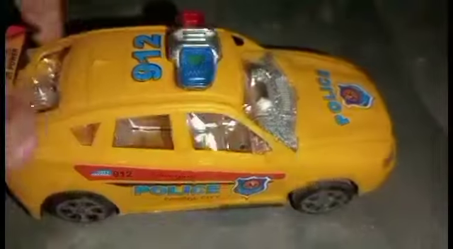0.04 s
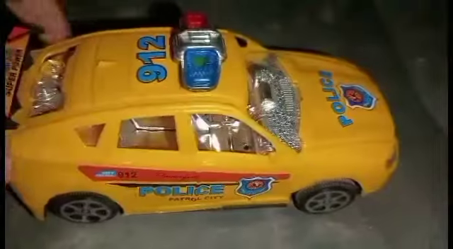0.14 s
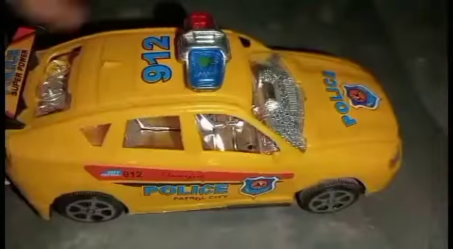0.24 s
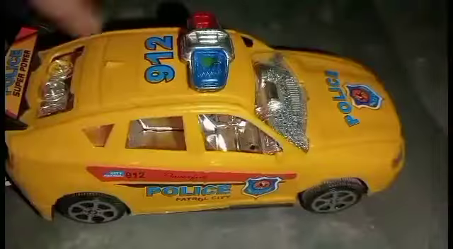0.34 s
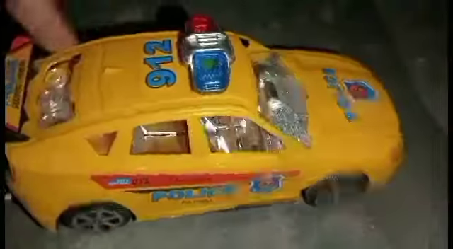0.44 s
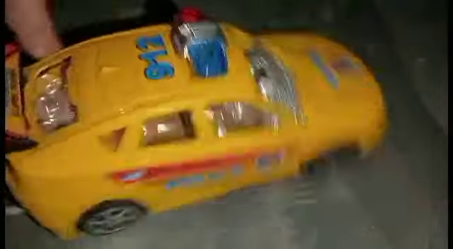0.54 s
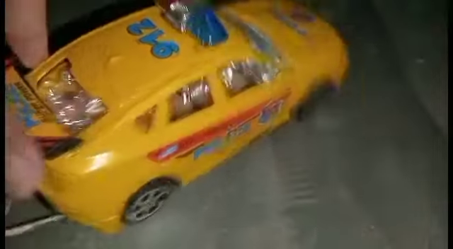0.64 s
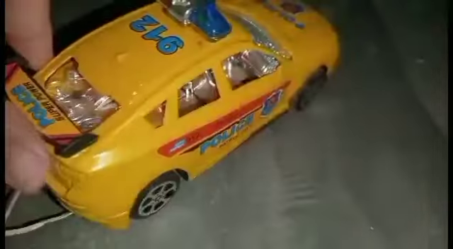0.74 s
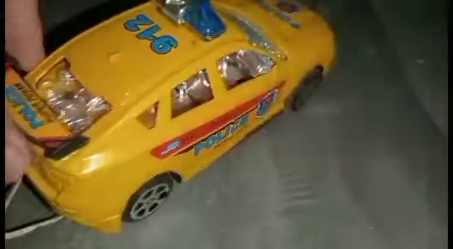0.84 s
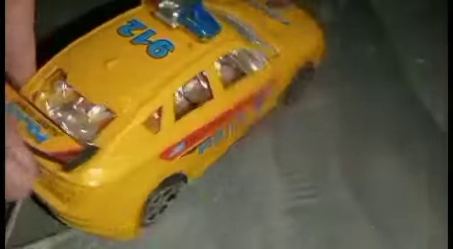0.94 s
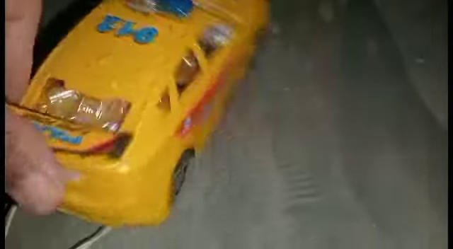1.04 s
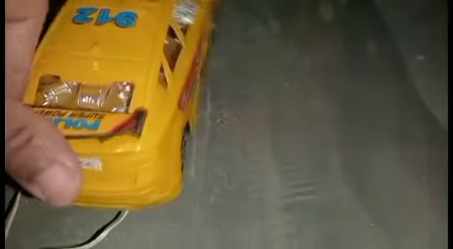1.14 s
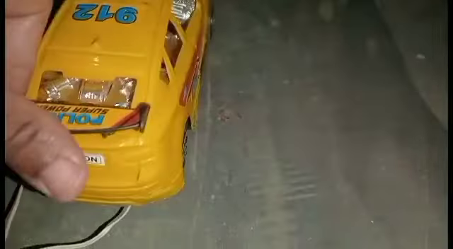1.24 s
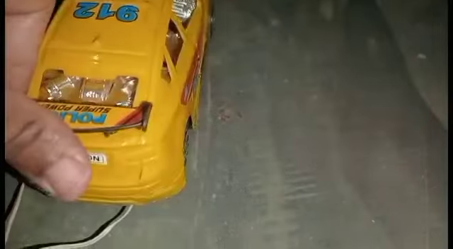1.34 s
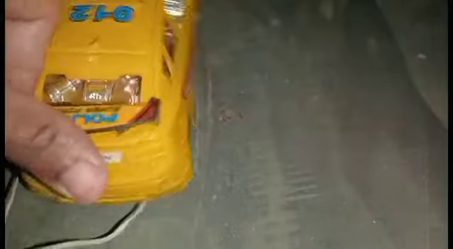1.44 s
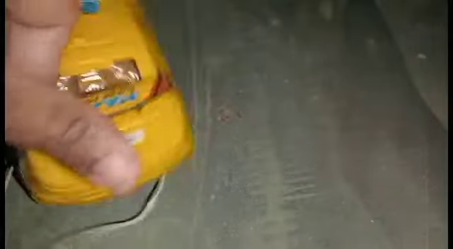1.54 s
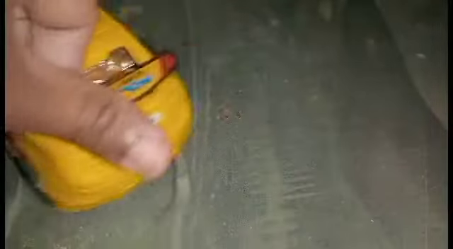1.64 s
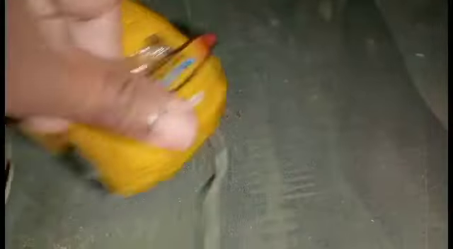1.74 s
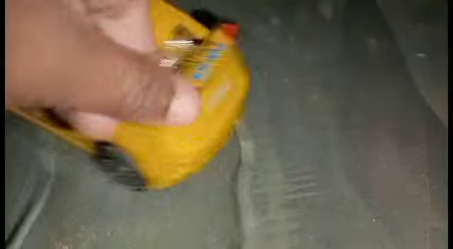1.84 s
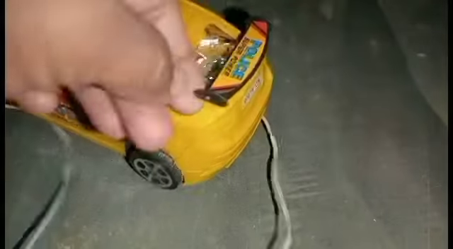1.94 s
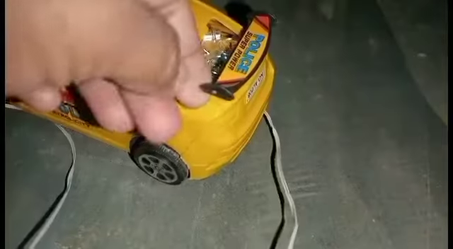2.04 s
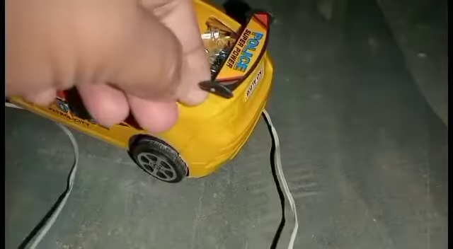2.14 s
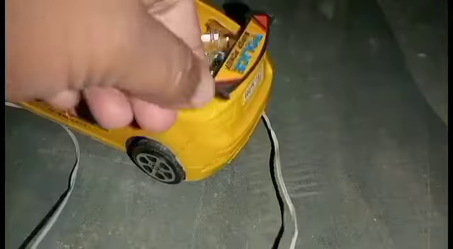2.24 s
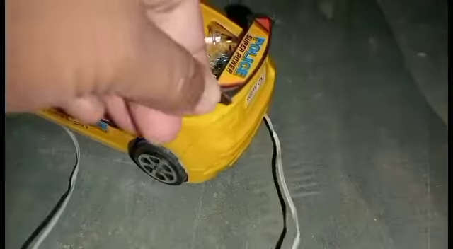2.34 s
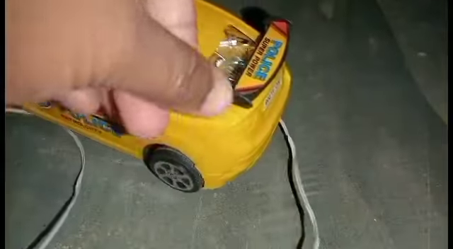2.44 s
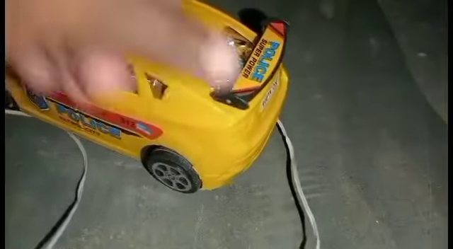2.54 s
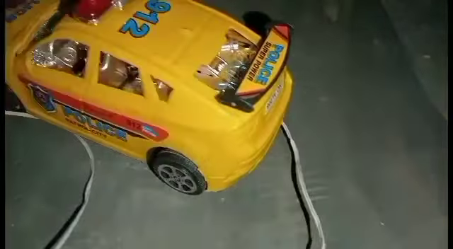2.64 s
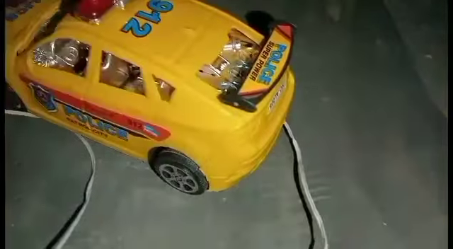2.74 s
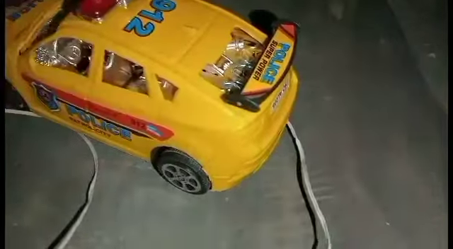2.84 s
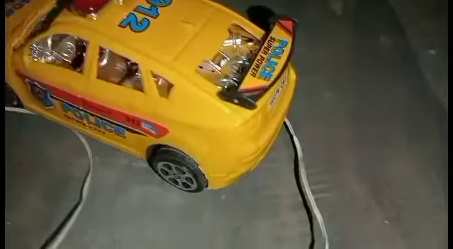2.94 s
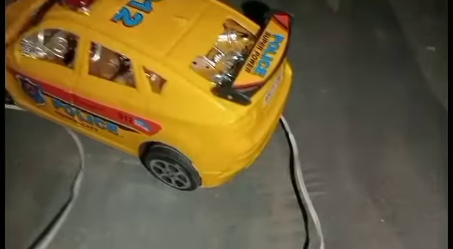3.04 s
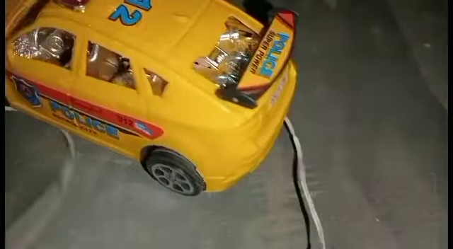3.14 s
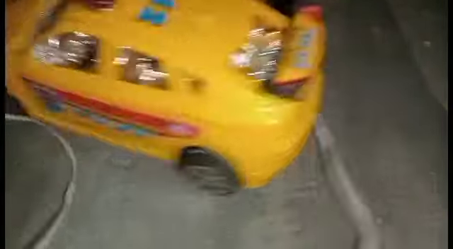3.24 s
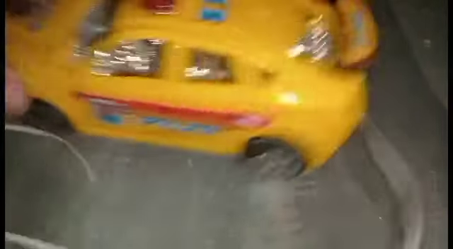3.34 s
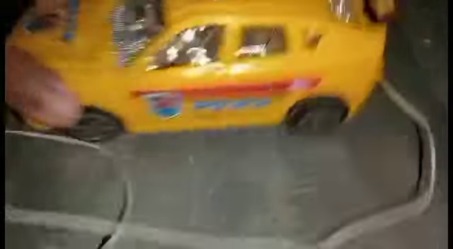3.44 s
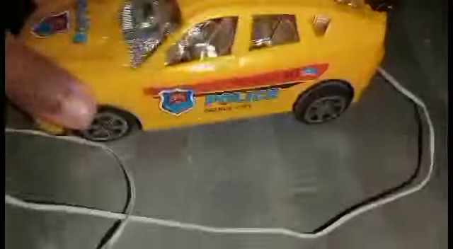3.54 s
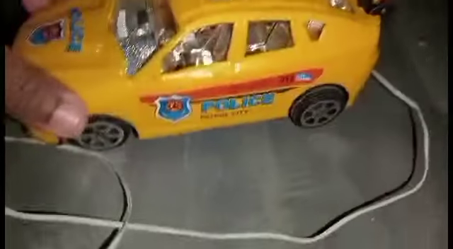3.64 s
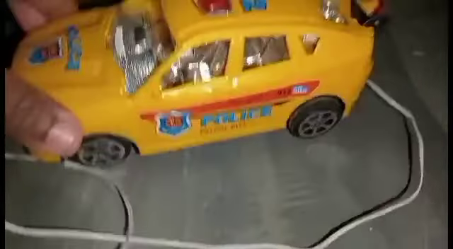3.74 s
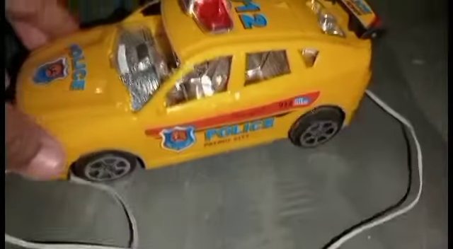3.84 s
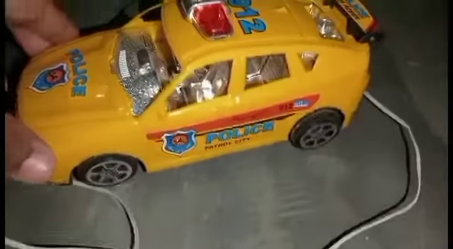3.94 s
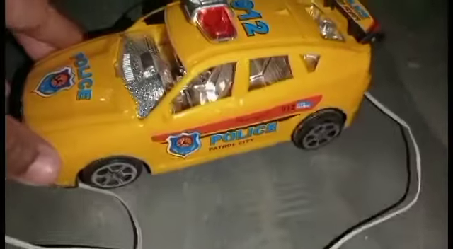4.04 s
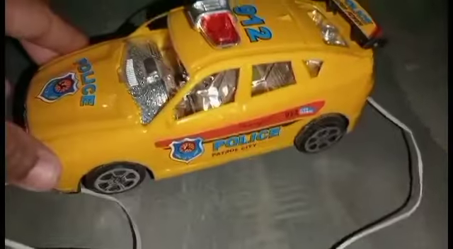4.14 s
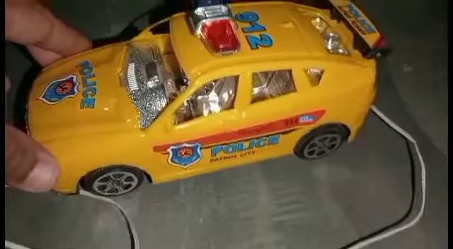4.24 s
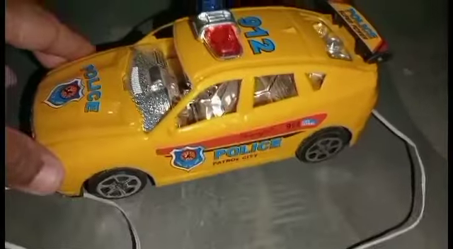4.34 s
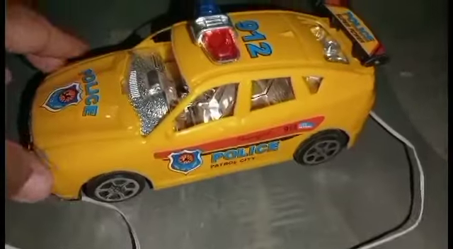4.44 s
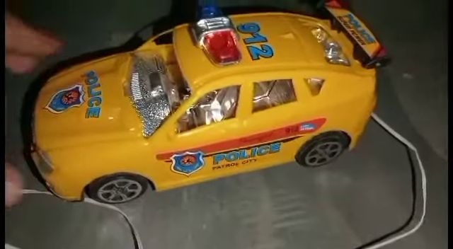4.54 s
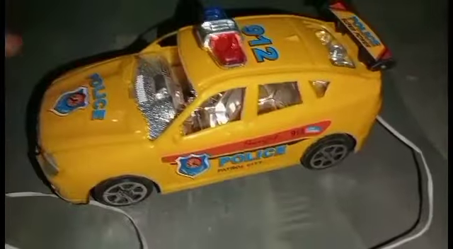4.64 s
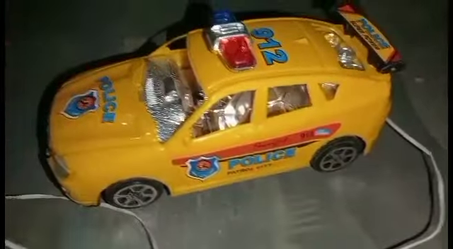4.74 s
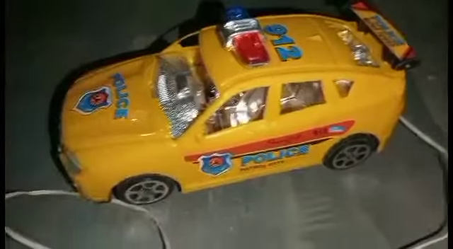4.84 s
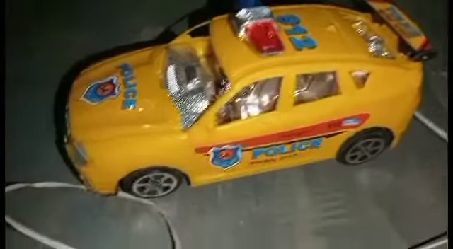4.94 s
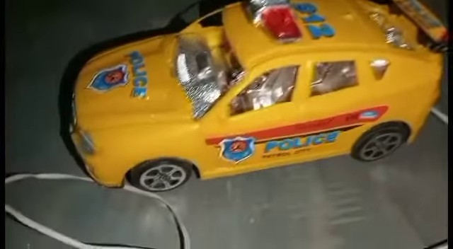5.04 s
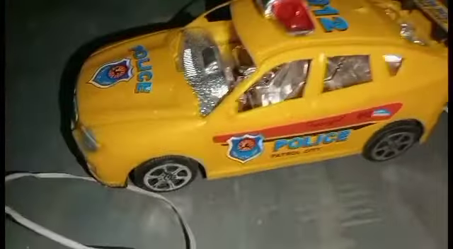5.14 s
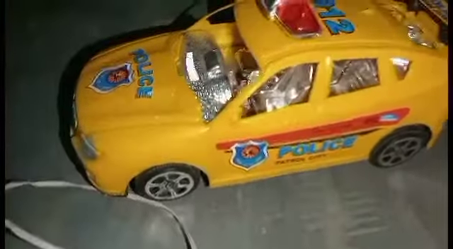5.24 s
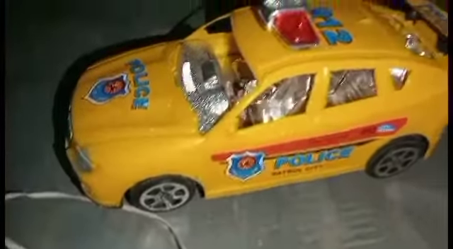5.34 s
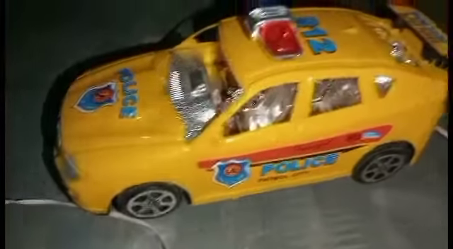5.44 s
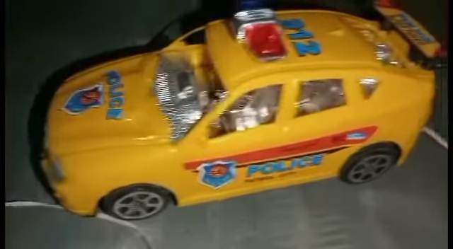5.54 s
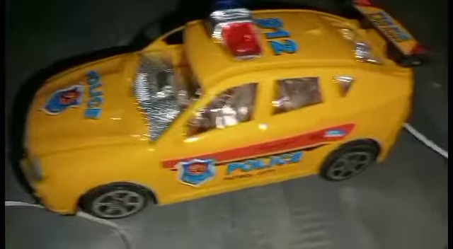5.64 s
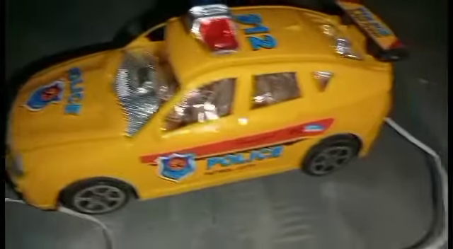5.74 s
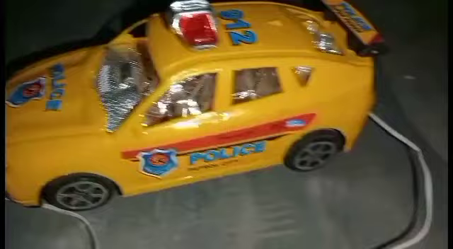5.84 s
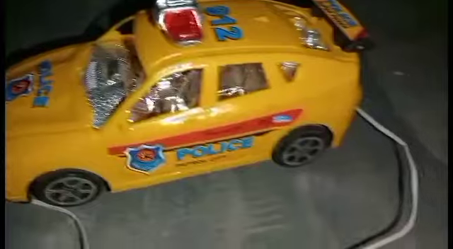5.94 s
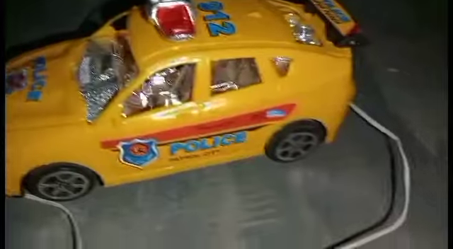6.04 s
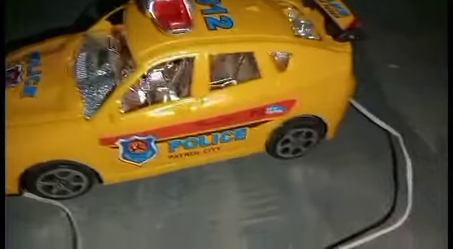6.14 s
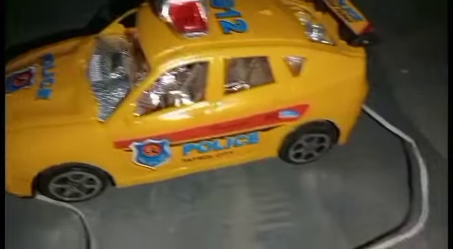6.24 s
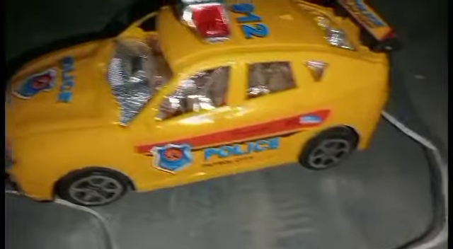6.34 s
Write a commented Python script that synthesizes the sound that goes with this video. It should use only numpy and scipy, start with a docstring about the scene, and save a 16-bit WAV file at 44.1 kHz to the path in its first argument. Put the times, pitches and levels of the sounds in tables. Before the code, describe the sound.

Close to the microphone in a small room, a hollow plastic toy car is pushed by hand over a hard, gritty floor. Short crunchy rasps with sharp plastic clacks come first, then a tight cluster of scrapes with a rough squawk around two seconds. Small ticks follow, then one strong swelling rasp after a pause, a few faint scuffs, and finally only faint hum and hiss.

```python
"""A hollow plastic toy car, pushed to and fro by hand on a hard, dusty floor, close to the microphone.
Four wheels crunch over grit and chatter on loose axles: random clicks excite the ringing shell.
Loose parts knock as short shell rings when the car is turned or stopped; one turn squawks by stick and slip.
Hands add a dull rumble and soft bumps. A small room answers with a noise tail over faint hum and hiss."""
import sys
import numpy as np
from scipy import signal
from scipy.fft import rfft, irfft, next_fast_len
from scipy.io import wavfile
from scipy.ndimage import uniform_filter1d, map_coordinates

SR = 44100
rng = np.random.default_rng(int(sys.argv[2]) if len(sys.argv) > 2 else 0)


def store_wav(level_fs):
    """Save 16-bit WAV to argv[1]."""
    pcm = np.round(np.clip(np.atleast_2d(level_fs), -1, 1) * 32767)
    wavfile.write(sys.argv[1], SR, pcm.T.astype(np.int16))


N = 282415
T = np.arange(N) / SR

# Strokes of the hand: start t/s, fastest t/s, stop t/s, top level/dB of the shell rasp, swell from the start/dB,
# run-out/(dB/s), floor rumble relative level/dB, grit hiss relative level/dB, treble boost/dB,
# shell ring under this grip f/Hz, its width f/Hz, its boost/dB
STROKES = [(0, 0.164, .27, -28, 10.5, 480, -17, -0.5, 2.5, 1690, 280, 6.5),
           (0.448, 0.449, 0.52, -66, 6.5, 320, -2.5, 3.5, 0, 1600, 300, 0.5),
           (0.672, .825, 0.93, -32, 11.5, 452, -13, -5, 15, 1760, 85, 10),
           (1.141, 1.32, 1.402, -29.5, 10.5, 750, -14, -2.5, 1.5, 1500, 229.8, 1.5),
           (1.637, 1.695, 1.718, -30, 11, 420, -16.5, -5, -2, 1379, 400, 7),
           (1.723, 1.799, 1.915, -31.5, 3.5, 418, -23.5, -.5, -5, 1600, 400, 2),
           (1.953, 2, 2.075, -34, 5, 420, -21.5, -4.5, -2.5, 1960, 401, 2.5),
           (2.091, 2.15, 2.194, -34.5, 3.5, 422, -16.5, -4.5, -4, 1600, 400, 0),
           (2.197, 2.222, 2.314, -43.5, 14.5, 520, -14.5, -2, -7, 1740, 400, 1),
           (2.395, 2.42, 2.46, -63.5, 9, 417, -18, -4, 12, 1910, 260, 7),
           (2.496, 2.514, 2.55, -45, 8, 750, -15, -10.5, 5, 1730, 260, 1),
           (2.62, 2.624, 2.737, -46, 12.5, 549, -15.5, -8, 9, 1700, 261, 7),
           (3.314, 3.32, 3.44, -58, 3.5, 420, -11.5, -1.5, 1.5, 1500, 300, 1),
           (3.434, 3.664, 3.752, -26, 14.5, 950, -14.5, -5.5, 1.5, 1530, 401.4, 4),
           (3.812, 3.88, 3.89, -42.5, 2.5, 326, -14.5, -7, 6, 1580, 120, 2.5),
           (3.958, 4.124, 4.137, -41, 3, 900, -16, -11, 8, 1520, 130, 10.5),
           (4.201, 4.183, 4.24, -41, 3.5, 850, -14.5, -8.5, -2, 1475, 110, 15),
           (4.325, 4.385, 4.502, -45, 6, 1000, -10, -5, 7, 1670, 100, 7)]
# Wheels, axles and shell knocking: t/s, peak level/dB, low thud level/dB and bright snap level/dB
# (both in the mix before it is scaled to the peak), main ring f/Hz
KNOCKS = [(0.013, -18.5, -25, -18, 1840), (.124, -16.5, -30, -11, 1700), (0.155, -17.5, -37, -4, 1660),
          (.167, -18, -38, -9, 1630), (0.177, -10.5, -46, -19, 1750), (.686, -21, -34, -15, 1780),
          (0.899, -15, -28, -12, 1784), (1.078, -32.5, -25, -20, 1565), (1.409, -19, -58, -13.5, 1424),
          (1.58, -44, -22, -12, 1370), (1.776, -17, -30, -6, 1830), (1.915, -15.5, -44, -8, 2010),
          (1.921, -15.5, -42, -9.5, 2180), (1.963, -17, -26, -11, 1960), (1.973, -15.5, -35, -19, 1890),
          (1.979, -9.5, -46, -17, 1970), (2.03, -11, -39, -9, 2154), (2.092, -17, -32, -10.5, 1480),
          (2.106, -9.5, -35, -4.5, 1560), (2.122, -18.5, -32, -9, 1730), (2.169, -19, -39, -28, 1580),
          (2.264, -30, -25, 1, 1980), (2.326, -32.5, -15.5, -16, 1740), (2.501, -17.5, -46, -14, 1843),
          (2.511, -31, -34, -30, 1390), (2.532, -35, -31, -11, 1620), (2.581, -47, -26, -10, 1420),
          (2.644, -28.5, -28, -8, 1390), (2.656, -20, -26, -11.5, 1566), (2.667, -27, -15.5, -32, 1420),
          (2.702, -29.5, -26, -36, 1610), (3.297, -29.5, -30, -10.5, 1636), (3.305, -28, -22, -11, 1980),
          (3.32, -29.5, -18, -25, 1440), (3.409, -33.5, -26, -2, 1600), (3.578, -12, -33, -25, 1935),
          (3.597, -14, -41, -18, 1990), (4.033, -32, -35, 4, 1600), (4.204, -29.5, -31, -6, 1380),
          (4.276, -40, -26, -22, 1650), (4.354, -31, -24, -18, 1260), (4.411, -35, -25, 0, 1370),
          (4.442, -25.5, -13.5, -3.5, 1790), (4.664, -53, -18, -8, 1640)]
# Colour of the shell and the floor under it: f/Hz, level/dB
SHELL_COLOUR = [(200, -35.5), (330, -32.5), (490, -17.5), (750, -11.5), (1050, -7), (1660, -1), (2400, -9),
                (3000, -15.5), (3420, -22), (4300, -8), (6100, -8.5), (7800, -20.5), (9600, -18.5),
                (14000, -30)]
# Clearest shell modes: f/Hz, ring time t60/s, level/dB
SHELL_MODES = [(644, 0.1, -17), (940, 0.049, -15.5), (1388, 0.076, -7.5), (1668, 0.065, -6),
               (1854, 0.068, -7), (2170, 0.033, -9), (2436, 0.069, -11.5), (2930, 0.087, -16),
               (4110, .04, -12.5), (4854, 0.036, -3.5), (5130, 0.033, -15), (5894, 0.031, -2)]
# Partials of the judder: multiple of the slip rate, level/dB
SKID_PARTIALS = [(1, -3), (2, -3.5), (3, -19.5), (4, -17.5), (5, -9), (6, -20)]
# Soft bumps of the hand: t/s, level/dB before the soft onset, f/Hz
BUMPS = [(.692, -50.5, 147), (1.065, -41.5, 108), (1.636, -40.5, 86), (1.898, -44, 94), (2.69, -44, 86),
         (2.728, -51, 129), (3.306, -53.5, 120), (5.471, -55, 110), (6.232, -51.5, 121)]
# Colour of the still room: f/Hz, relative level/(dB per Hz)
AIR_COLOUR = [(15, -55), (25, -26), (53, -17), (71, -5), (125, -7.5), (224, -18.5), (301, -12.5),
              (373, -20), (415, -16.5), (621, -22.5), (2630, -26), (7890, -34), (13800, -37), (15000, -33)]

# Strokes: the wheels break loose at the attack rate; around a push they still creep,
# LOOSE_DB below it and fading further at LOOSE_DB_PER_S
ATTACK_DB_PER_S, LOOSE_DB, LOOSE_DB_PER_S = 1100, 14.5, 170
SWELL_CURVE = 1.7  # 1 = swells at a steady dB per s, 2 = rounds off towards the top
BRAKE_SHARE = 0.67  # level lost before the stop, as a share of the swell
HISS_PER_DB, RUMBLE_PER_DB = 0.13, -0.04  # faster rolling is brighter: relative dB per dB of level
LOW_CUT_HZ = 260  # small wheels radiate little bass
HUB_HZ, HUB_WIDTH_HZ, HUB_DB = 5000, 570, 2.5  # ring of the wheel hubs
PANEL_T60_S = .024  # ring time of the panels after a knock
# The turn: a wheel judders sideways, and slips more slowly the harder it is pressed
SKID_START_S, SKID_STOP_S = 1.89, 2.06
SKID_LIGHT_HZ, SKID_PRESSED_HZ = 1112.7, 955
SKID_DB, SKID_JOLT_DB = -35, -6  # level at full pressure; extra squawk relative to the smoothed knocks
HOLD_DB, PUSH_DB = -73, -72  # low rumble of the hands at rest, and amplitude added while they push
AIR_DB = -68.5  # room air, before its wavering
TOP_HZ = 15450  # upper limit of the recorder


def rolling():
    """All four wheels over grit: each stroke is louder and brighter with speed; the grip tunes the shell."""
    wheels = [wheel(grains_per_s=1600, spread_db=3.0, chatter_db=3.0, chatter_rate=240) for _ in range(4)]
    total_load = np.sqrt(sum(load ** 2 for load, _ in wheels))
    crunch = sum(load * grit for load, grit in wheels) / total_load
    crunch = shifting(crunch, swing_db=3.5, rate=24, relative_width=0.086)
    crunch = crunch + (undb(HUB_DB) - 1) * resonate(crunch, HUB_HZ, HUB_WIDTH_HZ)
    crunch = signal.sosfilt(signal.butter(2, LOW_CUT_HZ, "high", fs=SR, output="sos"), crunch)
    treble = band(crunch, 9500, 21000, order=1)
    out = np.zeros(N)
    for (start, fastest, stop, db, swell_db, release, rumble_db, hiss_db, treble_db,
         ring_hz, width_hz, ring_db) in STROKES:
        moving = (T > start - .2) & (T < stop + .2)  # with the creep before and after
        drive_db = effort(T[moving], start, fastest, stop, swell_db, release)
        grit = crunch[moving]
        grip_ring = (undb(ring_db) - 1) * resonate(grit, ring_hz, width_hz)
        held = grit + grip_ring + (undb(treble_db) - 1) * treble[moving]
        rumble, rasp, hiss = registers(held)
        rumble = rumble * undb(rumble_db + RUMBLE_PER_DB * drive_db)
        hiss = hiss * undb(hiss_db + HISS_PER_DB * drive_db)
        out[moving] += undb(db + drive_db) * (rumble + rasp + hiss)
    return out


def effort(t, start, fastest, stop, swell_db, release_db_per_s):
    """Stroke level re its top, in dB: the car creeps, breaks loose, speeds up, slows and runs out."""
    speeding = np.clip((fastest - t) / max(fastest - start, 1e-3), 0, 1)
    slowing = np.clip((t - fastest) / max(stop - fastest, 1e-3), 0, 1)
    before, after = np.maximum(start - t, 0), np.maximum(t - stop, 0)
    steep_db = ATTACK_DB_PER_S * before + release_db_per_s * after
    creep_db = LOOSE_DB + LOOSE_DB_PER_S * (before + after)
    edge_db = np.minimum(steep_db, creep_db)
    return -swell_db * (speeding ** SWELL_CURVE + BRAKE_SHARE * slowing ** 2) - edge_db


def wheel(grains_per_s, spread_db, chatter_db, chatter_rate):
    """Grit under one wheel: mostly small clicks, a few bigger, bunched as the wheel hops on its axle."""
    hit = rng.random(N) < grains_per_s / SR
    size = undb(spread_db * np.minimum(rng.exponential(size=N), 3)) * rng.choice([-1, 1], N)
    grit = hit * size * undb(chatter_db * walk(chatter_rate))
    rung = signal.fftconvolve(grit, shell(ring_s=0.026, tick_db=-1.0, modes_db=-6))[:N]
    load = undb(3.59 * walk(14))  # the weight shifts from wheel to wheel, and with it the colour
    return load, unit(flex(rung, share=.014, rate=16))


def shell(ring_s, tick_db, modes_db):
    """Response to one contact: a tick, a dense cluster of panel rings, and the modes as struck at that spot."""
    t = np.arange(5000) / SR
    panels = rng.standard_normal(len(t)) * fade(t, ring_s)
    panels /= np.linalg.norm(panels)
    panels[0] += undb(tick_db)
    spot = rng.standard_normal((len(SHELL_MODES), 2))
    modes = np.zeros(len(t))
    for (hz, t60, db), (side, reach) in zip(SHELL_MODES, spot):
        strength = np.sign(side) * undb(db + 0.5 * reach)
        modes += strength * fade(t, t60) * np.sin(2 * np.pi * hz * t)
    return unit(colour(panels, SHELL_COLOUR)) + undb(modes_db) * unit(modes)


def flex(x, share, rate):
    """The shell gives under the hand, so its rings wander a little in pitch."""
    return map_coordinates(x, [np.cumsum(1 + share * walk(rate))], order=3, mode="mirror")


def shifting(x, swing_db, rate, relative_width):
    """As the points of contact move, each shell mode swells and fades on its own."""
    before = uniform_filter1d(x ** 2, size=1024)
    for hz, _, _ in SHELL_MODES:
        x = x + (undb(swing_db * walk(rate)) - 1) * resonate(x, hz, relative_width * hz)
    return x * np.sqrt(before / uniform_filter1d(x ** 2, size=1024))  # keep the short-term energy


def registers(x):
    """Split smoothly into floor rumble, shell rasp and grit hiss, each at rms 1."""
    size = next_fast_len(len(x) + 1024, real=True)
    spectrum, hz = rfft(x, size), np.arange(size // 2 + 1) * SR / size
    low = 1 / (1 + (hz / 850) ** 10)
    high = 1 - 1 / (1 + (hz / 3400) ** 10)
    return [unit(irfft(spectrum * share, size)[:len(x)]) for share in (low, 1 - low - high, high)]


def knocks(body_db, ring_db, ring_t60_s, contact_s):
    """Loose parts hit their stops: the shell responds, and each spot favours one panel ring."""
    out = np.zeros(N + SR)
    for s, db, thud_db, snap_db, ring_hz in KNOCKS:
        thud, body, snap = registers(shell(PANEL_T60_S, tick_db=-9.0, modes_db=-7.5))
        t = np.arange(len(body)) / SR
        ring = unit(np.sin(2 * np.pi * ring_hz * t) * fade(t, ring_t60_s))
        knock = undb(body_db) * body + undb(ring_db) * ring
        knock += undb(thud_db) * thud + undb(snap_db) * snap
        knock *= 1 - np.exp(-t / contact_s)  # the contact softens the onset
        start = int(s * SR)
        out[start:start + len(knock)] += undb(db) * knock / np.abs(knock).max()
    return out[:N]


def skid(jolts, jitter, flutter_db, scatter_db):
    """Stick and slip of a dragged wheel: a rough squawk that sinks under pressure and flares at each jolt."""
    through = np.clip((T - SKID_START_S) / (SKID_STOP_S - SKID_START_S), 0, 1)
    pressure = np.maximum(np.sin(np.pi * through), 0)
    hz = SKID_LIGHT_HZ + (SKID_PRESSED_HZ - SKID_LIGHT_HZ) * pressure
    phase = 2 * np.pi * np.cumsum(hz * (1 + jitter * walk(500))) / SR
    squawk = np.zeros(N)
    for multiple, partial_db in SKID_PARTIALS:
        squawk += undb(partial_db + scatter_db * walk(160)) * np.sin(round(multiple) * phase)
    force = undb(SKID_DB) + undb(SKID_JOLT_DB) * uniform_filter1d(np.abs(jolts), size=500)
    return unit(squawk * undb(flutter_db * walk(180))) * force * np.sqrt(pressure)


def handling(bump_t60_s, waver_db):
    """Dull rumble from the hands, stronger while they push, and soft bumps as decaying low sines."""
    pushing = np.max([(T > start) & (T < stop) for start, _, stop, *_ in STROKES], axis=0)
    pushing = uniform_filter1d(pushing.astype(float), size=4096)
    rumble = unit(band(rng.standard_normal(N), 45, 170, order=3))
    out = rumble * (undb(HOLD_DB) + undb(PUSH_DB) * pushing) * undb(waver_db * walk(10))
    for s, db, hz in BUMPS:
        t = np.maximum(T - s, 0)
        soft_onset = 1 - fade(t, 0.067)
        out += undb(db) * np.sin(2 * np.pi * hz * t) * fade(t, bump_t60_s) * soft_onset
    return out


def room(x, t60_s, wet_db):
    """Walls return a softly rising noise tail, its treble weaker but a little longer."""
    t = np.arange(SR // 2) / SR
    noise = rng.standard_normal(len(t))
    tail = band(noise, 150, 3000) * fade(t, t60_s)
    tail += undb(-5.0) * band(noise, 3000, 21000) * fade(t, 1.2 * t60_s)
    tail *= 1 - fade(t, .05)
    return x + undb(wet_db) * signal.fftconvolve(x, tail / np.linalg.norm(tail))[:N]


def background():
    """Room air as coloured noise, and a low hum that wavers in pitch and level."""
    air = unit(colour(rng.standard_normal(N), AIR_COLOUR)) * undb(AIR_DB + 0.77 * walk(4.8))
    hum_hz = 83.5 + 2 * walk(6.9)
    hum = np.sin(2 * np.pi * np.cumsum(hum_hz) / SR) * undb(-68.5 + 1.9 * walk(5.5))
    return air + hum


def undb(db):
    """Decibels to gain."""
    return 10 ** (np.asarray(db) / 20)


def unit(x):
    """Scale to rms 1."""
    return x / np.sqrt(np.mean(x ** 2))


def fade(t, t60):
    """Exponential decay, 60 dB down after t60."""
    return np.exp(-np.log(1000) * t / max(t60, 1e-3))


def walk(rate):
    """Smooth random wander with rms 1, about rate new values per second."""
    k = max(int(SR / rate), 2)
    steps = np.repeat(rng.standard_normal(N // k + 1), k)
    return unit(uniform_filter1d(steps, k)[:N])


def band(x, lo_hz, hi_hz, order=3):
    """Causal band-pass."""
    edges = [lo_hz, min(hi_hz, .45 * SR)]
    return signal.sosfilt(signal.butter(order, edges, "band", fs=SR, output="sos"), x)


def resonate(x, hz, width_hz):
    """One resonance, gain 1 at its centre."""
    return signal.lfilter(*signal.iirpeak(hz, hz / width_hz, fs=SR), x)


def colour(x, points):
    """Causal minimum-phase filter with the gain of (f/Hz, level/dB) points."""
    size = next_fast_len(len(x) + 2048, real=True) * 2
    hz, db = np.transpose(points)
    bins = np.maximum(np.arange(size // 2 + 1) * SR / size, 1)
    cepstrum = irfft(np.log(undb(np.interp(np.log(bins), np.log(hz), db))))
    cepstrum[1:size // 2] *= 2  # fold onto positive time
    cepstrum[size // 2 + 1:] = 0
    return irfft(rfft(x, size) * np.exp(rfft(cepstrum)))[:len(x)]


def scene():
    """The car in its room, with the hands and the background at the microphone."""
    jolts = knocks(body_db=-7, ring_db=-5.0, ring_t60_s=.025, contact_s=0.00048)
    car = rolling() + jolts + skid(jolts, jitter=0.023, flutter_db=2.5, scatter_db=4.0)
    hands = handling(bump_t60_s=0.11, waver_db=2.5)
    return (room(car, t60_s=.33, wet_db=-27) + hands + background())[None]


def record(dry):
    """The recorder cuts the top with a steep low-pass."""
    return signal.sosfilt(signal.ellip(10, .2, 80, TOP_HZ, fs=SR, output="sos"), dry)


dry = scene()
out = record(dry)
store_wav(out)
```